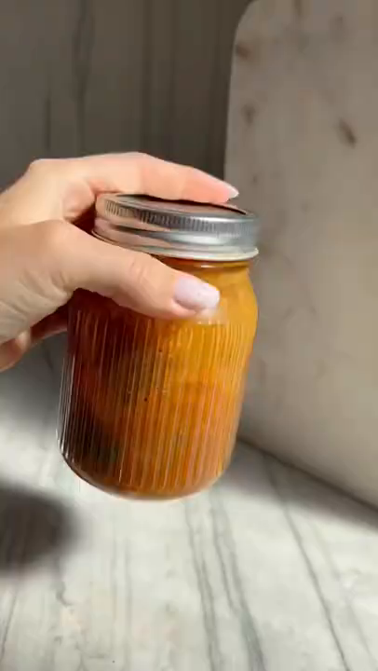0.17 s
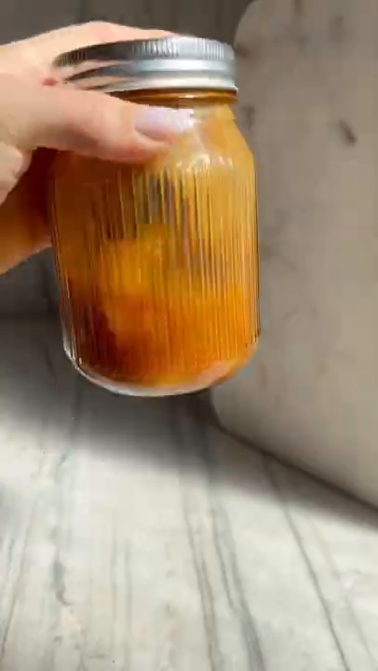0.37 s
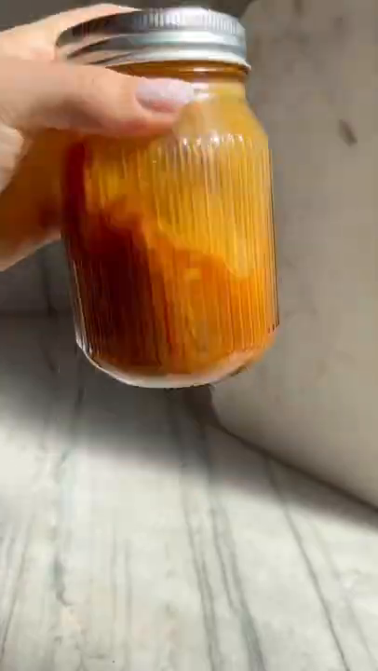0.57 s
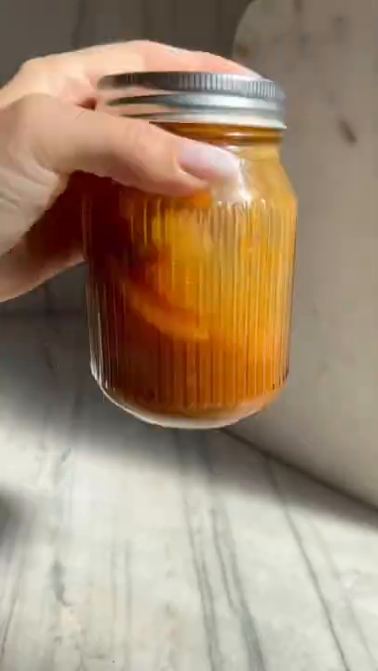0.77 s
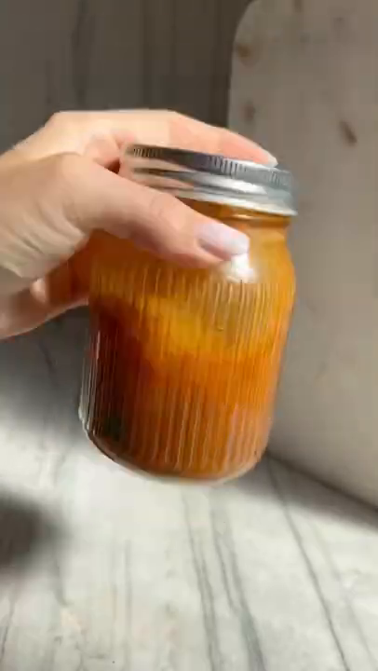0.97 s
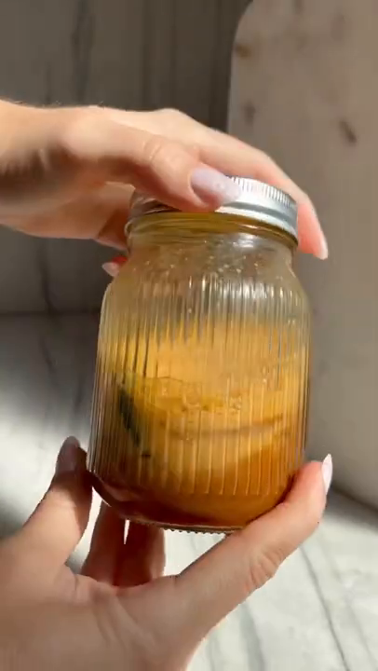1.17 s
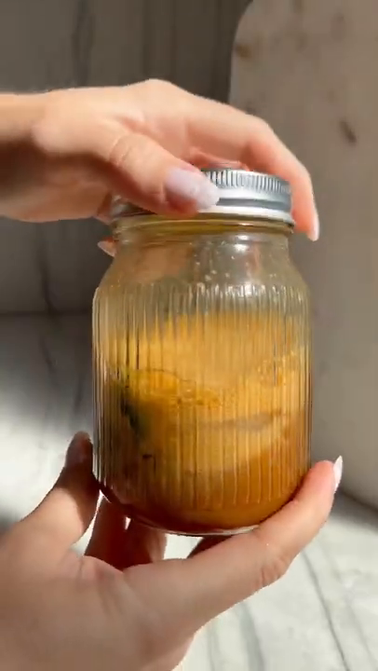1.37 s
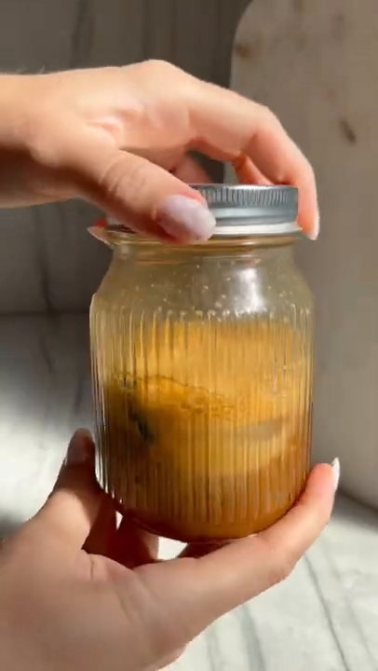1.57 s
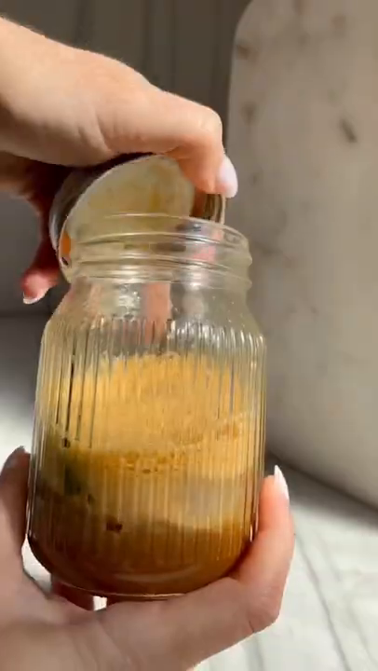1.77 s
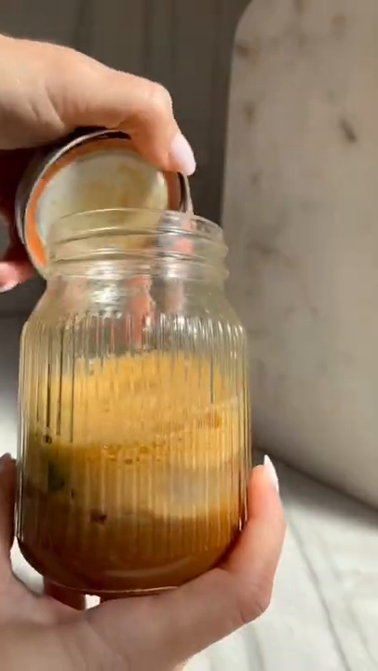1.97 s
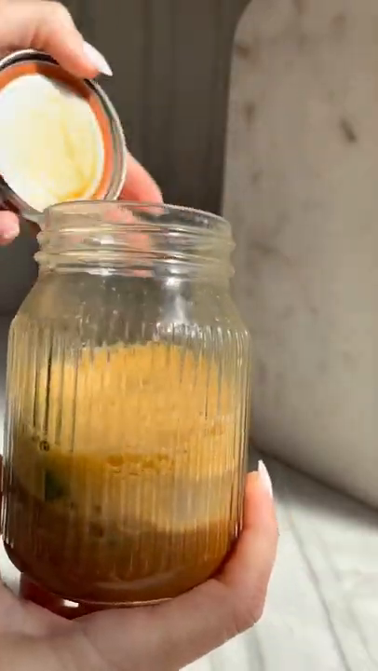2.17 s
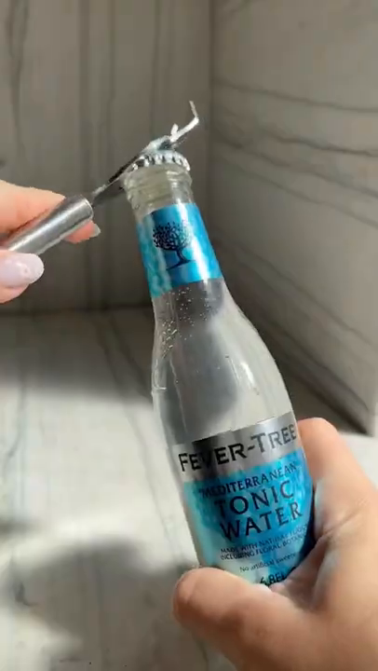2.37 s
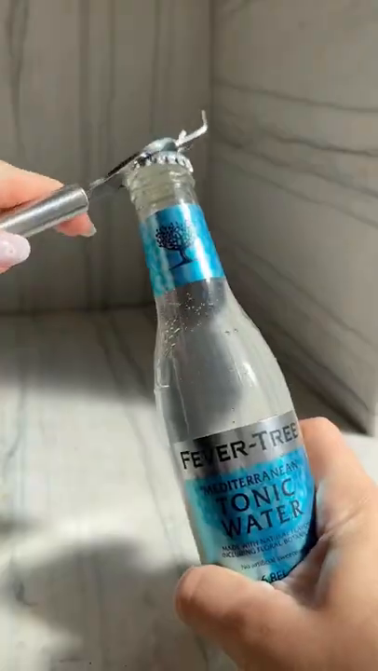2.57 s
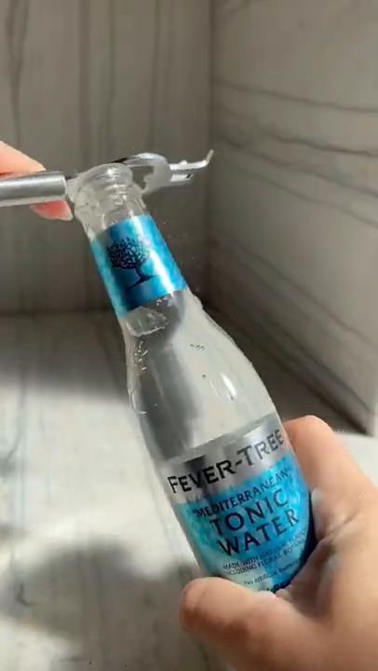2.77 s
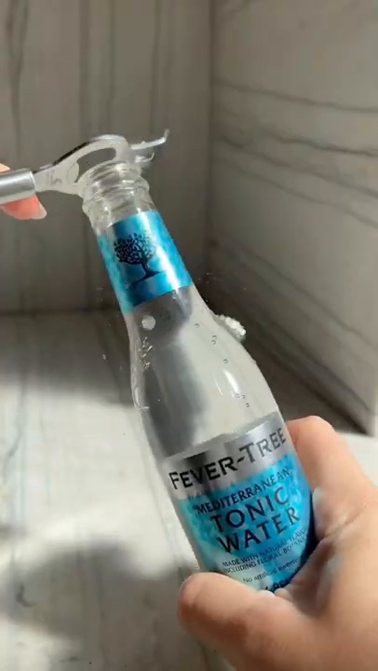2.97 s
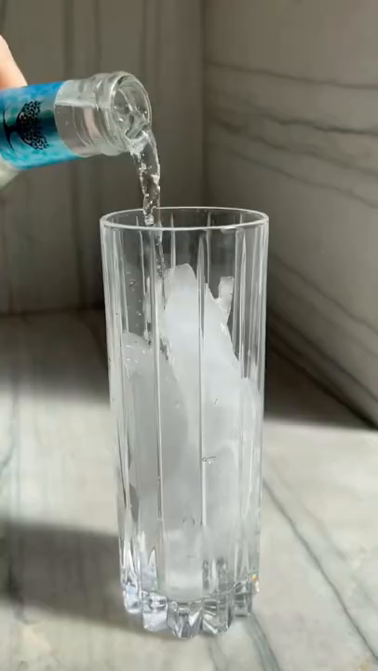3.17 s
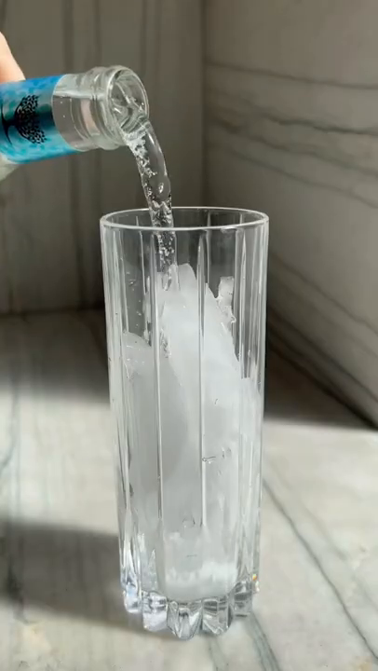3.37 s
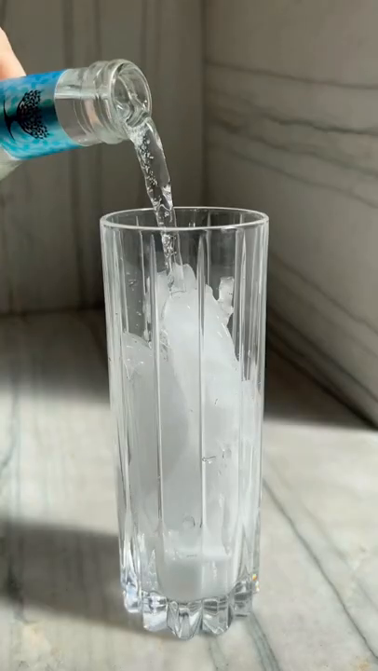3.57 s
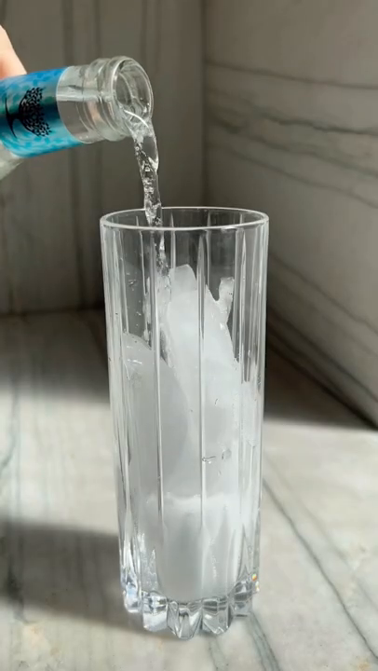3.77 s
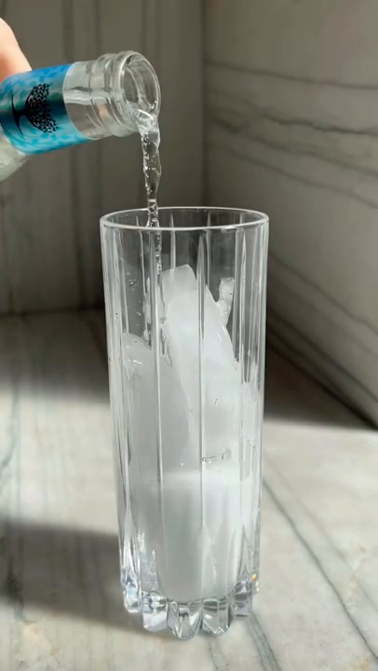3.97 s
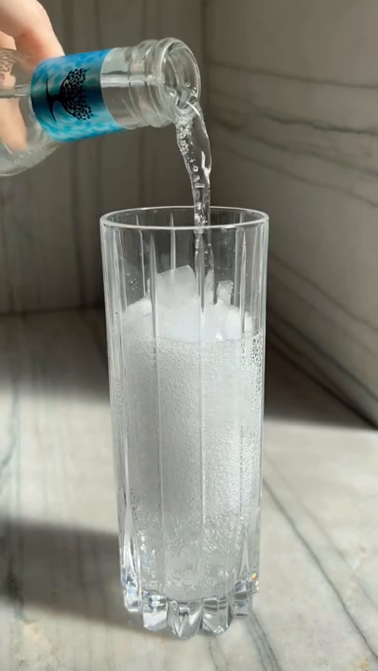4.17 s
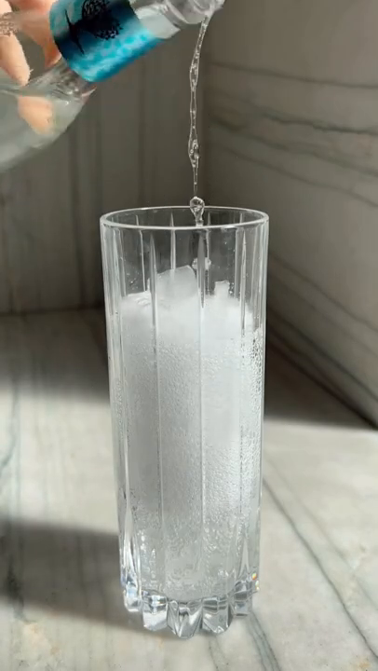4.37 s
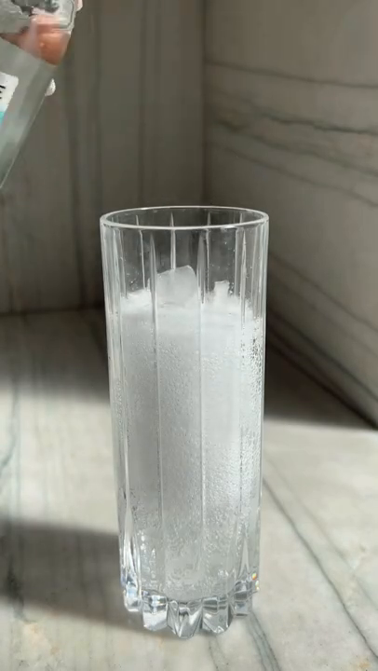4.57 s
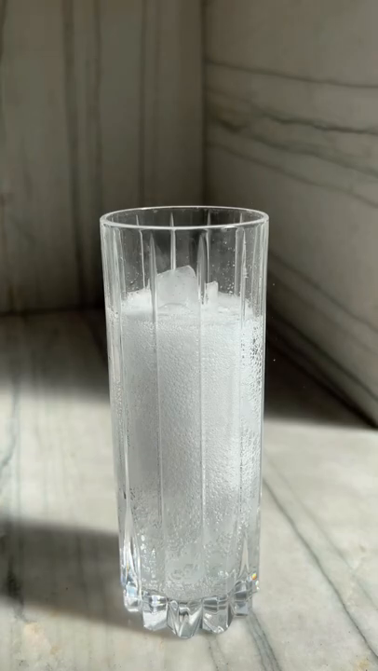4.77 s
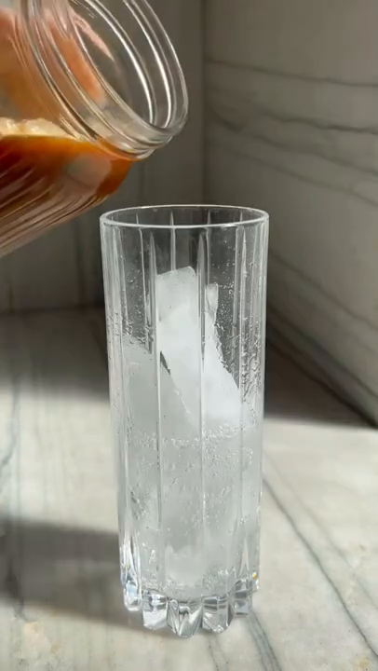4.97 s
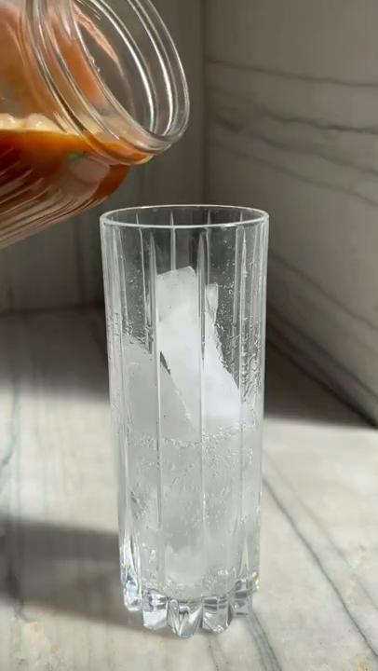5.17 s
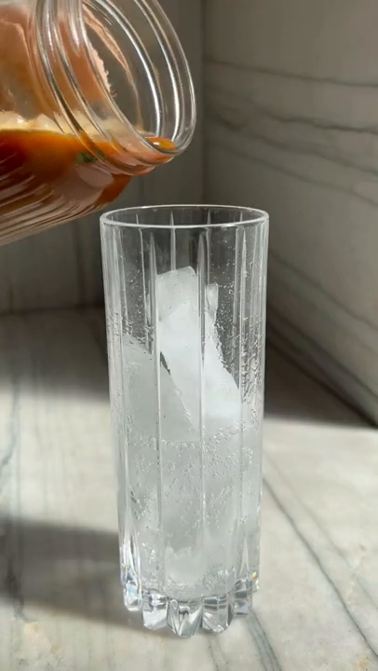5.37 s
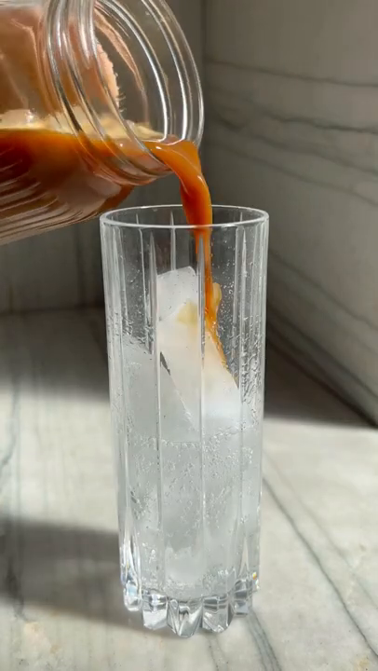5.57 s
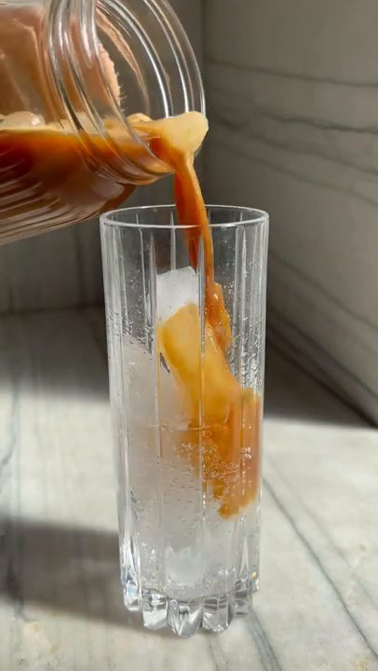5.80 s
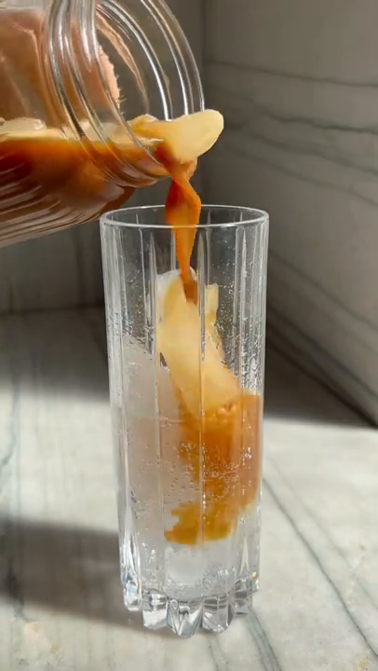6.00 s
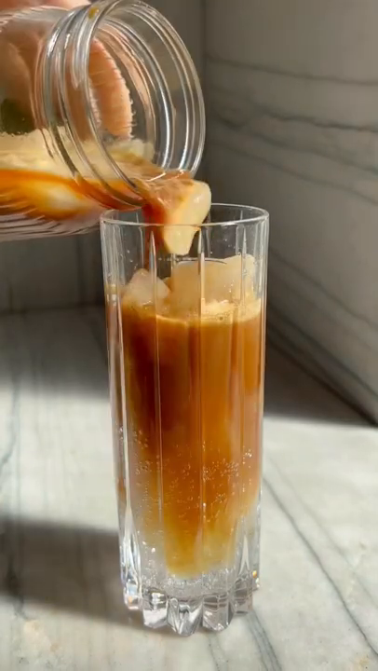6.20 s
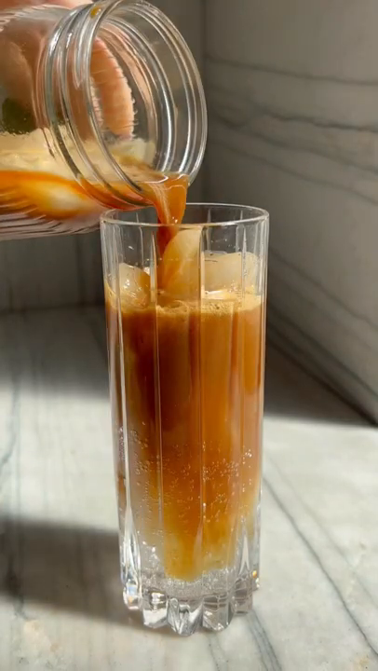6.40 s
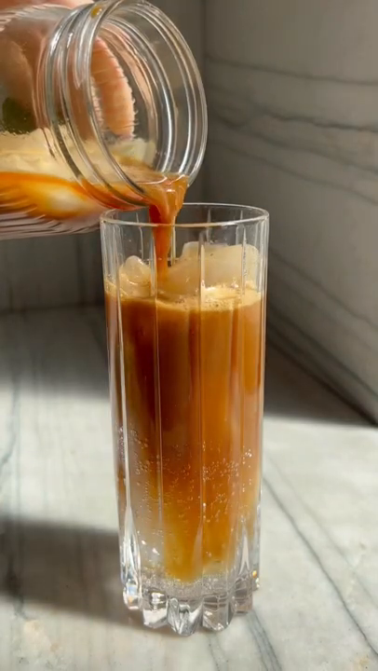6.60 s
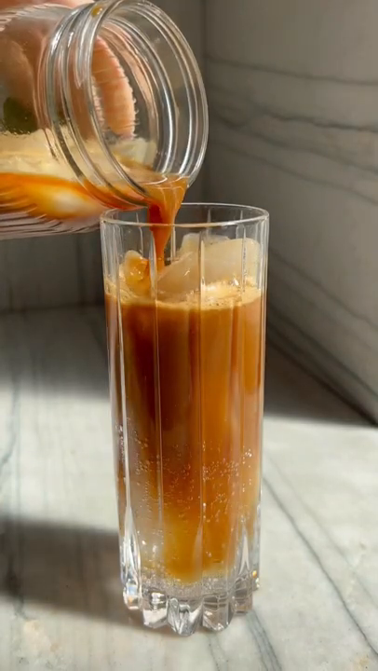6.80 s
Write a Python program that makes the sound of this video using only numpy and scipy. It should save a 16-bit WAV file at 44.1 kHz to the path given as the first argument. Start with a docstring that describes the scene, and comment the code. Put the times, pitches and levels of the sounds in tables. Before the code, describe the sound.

A close stereo kitchen sequence with hard cuts and a low, humming refrigerator-like rumble throughout. From 0 to 0.17 seconds, ice clatters brightly into a glass jar. Until about 1.03, four loud shaking strokes bring dense, hard ice rattles, wet churning and short hollow gulps. Near quiet follows until 1.7, when a metal lid comes away with a sharp clack, glassy ring and low thump, then small ticks up to 2.28. A tiny high puff at 2.49 precedes crisp prising knocks at 2.7; the cap knocks at 2.86 as hiss fades, with a brief ping at 3.07. Soda then pours very softly over ice, with rising glugs and fine fizz. The bottle clinks the rim at 4.65. From 5.57, coffee trickles with tiny drips and splashes; after 6.1 the trickle is fuller, with clearer ice clunks around 6.26, 6.35 and 6.6, dying down.

```python
"""Kitchen montage, about 6.8 s, shots cut hard over a refrigerator-like rumble (shaped noise and a hum).
Ice drops into a jar (modes rung by rough contact); it is shaken (random rattle, wet noise, gulping tones).
The lid comes off with a low thump; after a short high puff a bottle cap is prised off with another
(dying tones), and bounces as a high hiss trails off. Soda fizzes over ice in a tall glass (noise, gliding
bubble tones, air column); the bottle touches the rim; coffee follows with splashes and ice."""
import sys
import numpy as np
from scipy import signal
from scipy.fft import rfft, irfft
from scipy.io import wavfile
from scipy.ndimage import uniform_filter1d

SR = 44100
rng = np.random.default_rng(int(sys.argv[2]) if len(sys.argv) > 2 else 0)


def materialize(psi):
    """Save the field psi as 16-bit PCM at rate SR to the path in sys.argv[1].

    A 1-D psi becomes a single channel; in a 2-D psi each row is a channel.
    """
    bounded = np.clip(np.atleast_2d(psi).T, -1, 1)
    quanta = np.round(bounded * 32767).astype(np.int16)
    wavfile.write(sys.argv[1], SR, quanta)


N = 301644

# Shot boundaries in seconds.
CUTS_S = [0, .174, 1.034, 1.533, 2.291, 3.087, 4.021, 4.882, 6.105, 6.9]

# Rumble spectrum. Each row: frequency in Hz, relative level in dB per Hz.
RUMBLE = [(18, -30.5), (30, -1.5), (102, 2.5), (178, -21.5), (259, -13.5), (593, -23), (821, -33.5),
          (907, -34.5), (1110, -42.5), (1320, -39.5), (1500, -41.5), (1620, -44.5), (2540, -45.5),
          (5380, -58), (12000, -68), (15600, -89.5), (22000, -120)]
# Rumble by shot. Each row: level in dB, added air hiss above about 1 kHz in dB.
RUMBLE_BY_SHOT = [(-58.5, 5.3), (-57, 5.5), (-51.5, 7), (-50.5, 13.5), (-50, 5.5), (-51, -5), (-50, -1),
                  (-51, 6), (-50, 2)]
# Hum, one row: frequency in Hz, width in Hz, relative level in dB.
HUM_LINE = (119, 2.5, -67.5)
# Likeness of the channels in noise. Each row: frequency in Hz, left-right correlation (0-1).
STEREO_LIKENESS = [(60, 0.95), (180, 0.91), (550, 0.77), (1650, 0.33), (4970, 0.22), (15000, 0.089)]

# Ice into the jar. Each row: start in seconds, level in dB, pitch struck most in Hz, treble in dB.
ICE_DROP_BLOWS = [(0.0036, -27, 2590, 12), (0.0141, -24, 1520, -15), (0.0209, -17.5, 2566, -19),
                  (0.0434, -47, 2570, -17), (0.0731, -27, 2650, 6.5), (0.0866, -13, 2710, 7.5),
                  (0.093, -20, 2610, 0.5), (0.1284, -23.5, 1790, 8), (0.1461, -15, 2040, 10.5),
                  (0.1624, -26, 3270, -18)]
# Modes of the open jar. Each row: frequency in Hz, level in dB, t60 in seconds.
OPEN_JAR_MODES = [(807, -4, 0.055), (1780, -6, 0.015), (2037, -19.5, 0.14), (2450, -17.5, .05),
                  (2490, -4, 0.025), (3250, 3, 0.01), (3840, -2.5, 0.05), (4980, -8, .015),
                  (6100, -15, 0.016), (6350, -1.5, 0.027), (9270, -7.5, 0.061)]
# Contact noise. Each row: frequency in Hz, relative level in dB per Hz.
CONTACT_SPECTRUM = [(88, -46), (150, -11), (276, -12), (537, 1.5), (1330, -5), (1610, -4), (3400, -4),
                    (4660, -8.5), (6250, -6.5), (12900, -20.5), (16400, -28)]
# Loose chips and liquid dying down. Each row: start and end in seconds, first and last level in dB,
# treble in dB.
CHURN_RAMPS = [(0, .174, -29, -48.5, -1), (6.24, 6.84, -53.5, -72.5, -16.5)]

# Strokes of the shaking hand. Each row: start in seconds, length in seconds, highest rattle level in dB,
# churning level in dB.
SHAKE_STROKES = [(0.181, .11, -33.5, -39.5), (0.402, 0.12, -23.5, -37.5), (0.621, .14, -25, -41),
                 (0.862, 0.11, -26, -36)]
# Clearest knocks in the shaken jar. Each row: start in seconds, level in dB, pitch struck most in Hz,
# treble in dB.
SHAKE_BLOWS = [(0.2031, -28, 3040, -16.5), (0.241, -21, 3250, -5), (0.2516, -14.5, 2840, -0.5),
               (0.2646, -8.5, 3240, 7), (0.3451, -30.5, 3460, -17), (0.3705, -23.5, 3400, 3),
               (0.4079, -14, 1100, -3), (0.4179, -15.5, 3580, -11), (0.4274, -15, 3260, -5),
               (0.4373, -18, 3500, 6.5), (0.46, -14.5, 3170, 10.5), (0.4766, -14, 6250, 7.5),
               (0.5018, -15.5, 3600, 4), (0.5118, -10, 3300, 4.5), (0.6031, -24.5, 5600, 14),
               (0.631, -21, 3460, 1), (0.6414, -23, 3460, -6), (0.6598, -16.5, 3350, -14.5),
               (0.6715, -19.5, 3300, -12), (0.698, -14, 3300, 0), (0.721, -21, 3400, 8),
               (0.7278, -10.5, 7000, 4.5), (0.7366, -14.5, 2450, 7.5), (0.8355, -22, 3300, -0.5),
               (0.8679, -20.5, 2450, -6), (0.8892, -18.5, 3050, -6.5), (0.9026, -13.5, 3330, -5.5),
               (0.9371, -17.5, 3100, -19), (0.9434, -19, 2700, -3.5), (0.9518, -8.5, 3010, 5),
               (0.9674, -11.5, 2980, 1.5), (0.981, -14.5, 3060, 11.5), (1.008, -18.5, 3510, 4.5)]
# Modes of the full jar. Each row: frequency in Hz, level in dB, t60 in seconds.
FULL_JAR_MODES = [(607, -20.5, 0.073), (1072, 5.5, 0.012), (2090, -16.5, 0.0763), (2590, 2, 0.033),
                  (3060, 5, 0.018), (3300, 6, 0.015), (3460, 2, 0.045), (3800, -7.5, 0.15),
                  (5530, 1.5, 0.0099), (6250, 5.5, 0.026), (6200, -12.5, 0.036), (7770, 1, 0.04)]
# Air pockets gulping in the jar. Each row: start in seconds, level in dB, frequency in Hz,
# left over right in dB.
GULP_TONES = [(0.183, -23.5, 456, 11.5), (0.204, -29.5, 452, 14), (0.269, -31, 701, -6),
              (0.407, -24.5, 270, 1.5), (0.409, -25, 1100, -7), (0.442, -29, 280, 0), (0.482, -28, 670, 1),
              (0.676, -29.5, 621, -15.5), (0.699, -32.5, 624, -13.5), (0.75, -33.5, 486, -0.5),
              (0.868, -23, 353, 2), (0.88, -22, 279.5, -5.5), (0.888, -25, 641, -0.5),
              (0.922, -35.5, 476, 0), (0.951, -29, 912, 0)]

# Lid. Each row: start in seconds, level in dB, pitch struck most in Hz, treble in dB, factor on the t60.
LID_BLOWS = [(1.2925, -58, 1520, -26, 0.47), (1.6844, -43, 6230, 3, 3.05), (1.6921, -34, 6170, 4, 3.2),
             (1.7084, -22.5, 3840, 1, 0.93), (1.718, -14, 2560, 6, 0.4), (1.7335, -8.5, 2500, 11, .4),
             (1.7474, -18, 2300, 0, 0.53), (1.7544, -25, 2500, 25, .6), (1.8143, -27.5, 6130, 9, 0.79),
             (1.8657, -37.5, 2590, 6, 2.3), (1.921, -33, 3270, -3, 0.89), (1.9475, -34.5, 1920, 2.5, .5),
             (2.0467, -59, 1885, -14, .6), (2.16, -61, 3310, -27, .9), (2.1954, -38.5, 2480, 6, 0.66),
             (2.2383, -30, 2420, 9.5, 0.93), (2.2707, -23, 2480, 14.5, 1.37)]
# Modes of the lid on the jar. Each row: frequency in Hz, level in dB, t60 in seconds.
LID_MODES = [(746, -4.5, .05), (1958, -6, 0.062), (2300, -11, 0.031), (2473, -2, 0.044),
             (2648, -7.5, 0.025), (3030, -21, .04), (3634, -7, 0.062), (3720, -15.5, 0.086),
             (5640, -15.5, .03), (6250, -11.5, .035), (6890, -7.5, 0.11), (7220, -20, .025),
             (8850, -21.5, 0.023), (12630, -13.5, 0.022)]
# Lid on the rim, rung by the jar wall. Each row: start in seconds, level in dB, pitch struck most in Hz,
# treble in dB, factor on the t60.
JAR_WALL_BLOWS = [(1.709, -28, 1480, -12.5, 0.92), (1.734, -31, 834, -12.5, 0.8),
                  (1.748, -20, 727, -12, 0.5)]
# Low modes of the jar wall. Each row: frequency in Hz, level in dB, t60 in seconds.
JAR_WALL_MODES = [(727, -2, .12), (834, -2.5, 0.11), (853, -6.5, 0.5), (1480, 0, 0.22)]
# Low thumps as the lid and then the cap let go. Each row: start in seconds, level in dB,
# frequency in Hz, t60 in seconds.
LOW_THUMPS = [(1.735, -25, 232, 0.044), (2.713, -35.5, 72.3, 0.28)]

# Short high hissing puff, then the prising knocks. Each row: start in seconds, level in dB,
# pitch struck most in Hz, treble in dB.
PUFF_AND_PRISING = [(2.488, -32.5, 12500, 29), (2.497, -47.5, 12500, 18), (2.6905, -31.5, 3600, 6),
                    (2.6979, -17.5, 11300, 1), (2.703, -18.5, 3840, 16), (2.7106, -8, 2283, 6.5),
                    (2.7154, -24, 4030, 12), (2.7208, -19, 3900, 17), (2.7275, -15.5, 4050, 4.4),
                    (2.7315, -18.5, 3840, 2.5), (2.7392, -34.5, 3870, 14), (2.828, -37.5, 7070, 16)]
# Modes of the gripped cap. Each row: frequency in Hz, level in dB, t60 in seconds.
GRIPPED_CAP_MODES = [(1100, -11, .04), (2158, 2, 0.019), (3600, -9.5, .03), (3870, 3.5, 0.044),
                     (4050, -3.5, 0.11), (4560, 2, 0.041), (7070, -4.5, 0.027), (8300, -9, 0.032),
                     (11300, -8, 0.026), (12100, -11.5, 0.014), (12500, -2, 0.035), (13200, -3, 0.034),
                     (14400, -22, .1)]
# Fizz spectrum. Each row: frequency in Hz, relative level in dB per Hz.
FIZZ_SPECTRUM = [(530, -25), (900, -9.5), (1190, -29), (1410, -1.5), (1650, -10.5), (2520, -10.5),
                 (2750, -7.5), (5760, -5.5), (6580, -1), (10400, 2), (11900, 11), (15200, -1), (16400, -53)]
# High hiss trailing off around the cap's blow, then foam in each shot. Each row: start and end in seconds,
# first and last level in dB, treble in dB.
HISS_RAMPS = [(2.8, 3.07, -47, -69, -33), (3.088, 4.023, -64, -63.5, -19), (4.023, 4.884, -62, -62, -19.5),
              (4.884, 6.105, -65.5, -74, -23.5), (6.105, 6.9, -72, -82, -31.5)]
# Loose cap. Each row: start in seconds, level in dB, pitch struck most in Hz, treble in dB,
# factor on the t60.
CAP_BLOWS = [(2.8582, -8.5, 4156, -3.5, 0.63), (2.952, -41, 4156, -16.5, .7),
             (3.071, -13.5, 4156, 0.5, 3.4)]
# Modes of the loose cap. Each row: frequency in Hz, level in dB, t60 in seconds.
CAP_MODES = [(790, -20.5, 0.071), (1880, -30, 0.17), (3870, -7, 0.061), (4156, -17.5, 0.43),
             (4152, -4.5, 0.058), (7130, -17.5, 0.065), (7400, -17.5, 0.25), (9740, -25.5, 0.086),
             (12840, -8.5, 0.11), (12400, -15.5, .05), (14300, -12, 0.079)]

# Filled glass colouring the hiss. Each row: frequency in Hz, width in Hz, relative level in dB.
GLASS_RESONANCES = [(2120, 177, 18), (3510, 580, 9), (4400, 83, 17.5), (5250, 32, -9), (12600, 310, -3)]
# Low mode of the air above the liquid. Each row: start and end in seconds,
# first and last level in dB per Hz, first and last frequency in Hz.
COLUMN_LOW = [(3.11, 3.86, -99, -80, 600, 790), (3.86, 4.884, -96.5, -93.5, 770, 760),
              (5.5, 6.9, -93, -96, 642, 630)]
# Its upper band. Each row: start and end in seconds, first and last level in dB per Hz, frequency in Hz.
COLUMN_UPPER = [(3.11, 4.023, -107, -104, 1490), (4.023, 4.884, -93.5, -91, 1580),
                (4.884, 6.105, -108, -110, 1780), (6.105, 6.9, -88, -106, 1580)]
# Glugs as soda falls through the ice. Each row: first and last start in seconds, mean level in dB,
# first and last frequency in Hz.
GLUG_RUNS = [(3.123, 3.215, -51, 590, 620), (3.505, 3.73, -49.5, 646, 733)]
# Single bubbles and drips. Each row: start in seconds, level in dB, frequency in Hz.
SINGLE_BUBBLES = [(3.437, -48.5, 730), (3.765, -47, 1740), (3.807, -41, 1597), (3.826, -42.5, 800),
                  (4.193, -50, 1450), (4.227, -56, 1590), (5.583, -48, 2690), (5.586, -52, 654),
                  (5.734, -49, 2130), (5.775, -45.5, 1340), (5.802, -41, 3800), (5.831, -52, 2090),
                  (5.853, -60, 3150), (5.856, -49.5, 604), (5.933, -53.5, 1820), (6.059, -54, 2620),
                  (6.124, -53, 576), (6.167, -49.5, 1400), (6.188, -54.5, 1670)]
# Liquid trickling over ice. Each row: start and end in seconds, mean level in dB,
# lowest and highest frequency in Hz.
TRICKLE_SPANS = [(3.504, 3.9, -62.5, 1290, 2200), (5.57, 6.098, -65, 1310, 4550),
                 (6.11, 6.696, -57.5, 1290, 3600)]
# Splashes of poured liquid and ice knocks in the tall glass. Each row: start in seconds, level in dB,
# pitch struck most in Hz, treble in dB.
SPLASHES_AND_KNOCKS = [(3.3744, -41.5, 1400, 11), (3.6371, -40.5, 2900, 16), (3.7, -37.5, 5250, -1.5),
                       (3.7693, -43, 4460, -3), (5.6077, -48.5, 4130, 0), (5.7154, -46.5, 6560, -9.5),
                       (5.7334, -38.5, 2280, 5.5), (5.7743, -40.5, 1390, -3), (5.8012, -35, 3870, 13),
                       (5.8536, -46.5, 3220, -14), (5.9509, -46, 7880, 9), (6.035, -63.5, 6700, 10.5),
                       (6.0596, -50.5, 2720, 7.5), (6.085, -52, 6000, 10), (6.1983, -45.5, 1700, 1.5),
                       (6.2567, -19.5, 1400, -2), (6.2694, -27.5, 1480, 0), (6.2794, -29, 1850, -14),
                       (6.349, -21, 1900, 1), (6.4298, -42.5, 1410, -19), (6.549, -44, 1880, -10.5),
                       (6.5989, -43, 1970, -14), (6.6114, -29, 1360, -18), (6.735, -56, 6800, 12),
                       (6.776, -40.5, 3800, 3)]
# Modes of the tall glass. Each row: frequency in Hz, level in dB, t60 in seconds.
GLASS_MODES = [(800, 2.5, 0.12), (1400, -4, 0.03), (1700, 1, 0.02), (1978, -0.5, 0.026), (2866, -5, 0.026),
               (3150, 0.5, 0.024), (3830, 4, 0.011), (4580, 4, 0.0077), (5140, 2, 0.012),
               (6800, 6.5, 0.016), (8210, 0, 0.017)]
# Bottle neck on the rim. Each row: start in seconds, level in dB, pitch struck most in Hz, treble in dB.
BOTTLE_BLOWS = [(4.6543, -31.5, 6800, 3.4)]
# Modes of the bare rim. Each row: frequency in Hz, level in dB, t60 in seconds.
RIM_MODES = [(802, -15, 0.057), (3210, 2.5, 0.045), (6800, 2, 0.081), (11530, -6.5, 0.047)]

# Uneven reach of near sources to the two microphones. Each row: frequency in Hz, left lead in radians.
MIC_PHASE = [(0, -1.8), (780, -0.27), (1380, 0.0095), (6290, -1.43), (8010, -1.42), (14300, -1.6),
             (16100, -1.9)]
# Room decay. Each row: frequency in Hz, t60 in seconds.
ROOM_T60 = [(200, 0.31), (1000, 0.22), (3000, 0.23), (8000, 0.24), (14000, 0.12)]


def gain_of(db):
    """Decibels to amplitude factor."""
    return 10 ** (np.asarray(db) / 20)


def db_of(gain):
    """Amplitude factor to decibels."""
    return 20 * np.log10(gain)


def evened(x):
    """Scales to rms 1."""
    return x / np.sqrt(np.mean(x ** 2) + 1e-20)


def read(points, hz):
    """Interpolates a spectrum table over log frequency."""
    point_hz, value = np.transpose(points)
    return np.interp(np.log(hz + 1), np.log(point_hz + 1), value)


def ramps(rows, t):
    """Level running straight from first to last dB in each row, the other columns, progress 0-1."""
    rows = np.array(rows)
    row_at = np.clip(np.searchsorted(rows[:, 0], t) - 1, 0, len(rows) - 1)
    start, end, first_db, last_db, *rest = rows[row_at].T
    along = (t - start) / (end - start)
    inside = (along >= 0) & (along <= 1)
    level_db = np.where(inside, first_db + (last_db - first_db) * along, -200.)
    return level_db, rest, np.clip(along, 0, 1)


def add(mix, start_s, sound, pan_db):
    """Mixes a sound into both channels, cut at the end of its shot."""
    end_s = min(cut for cut in CUTS_S if cut > start_s)
    part = mix[:, round(start_s * SR):round(end_s * SR)][:, :len(sound)]
    part += gain_of([[pan_db / 2], [-pan_db / 2]]) * sound[:part.shape[1]]


def tilt_db(hz, treble_db, bass_db):
    """Shelves that open above 5 kHz and below 1.4 kHz."""
    return treble_db / (1 + (5000 / (hz + 1)) ** 6) + bass_db / (1 + (hz / 1400) ** 6)


def resonances(hz, peaks, lift):
    """Gain of a row of resonances over a flat response."""
    return 1 + lift * sum(gain_of(db) / (1 + (2 * (hz - f) / width) ** 2) for f, width, db in peaks)


def noise(field_db, size, patchy_db, flicker_db):
    """Random short-time spectra under a level field (Hz, s), with local patches and broadband flicker."""
    hz = np.fft.rfftfreq(size, 1 / SR)[:, None]
    t = np.arange(4 * N // size + 5) * size / 4 / SR
    a, b, c, d, patches = rng.standard_normal((len(t), len(hz), 5)).T
    patches = evened(uniform_filter1d(uniform_filter1d(patches, 6, 0), 10, 1))  # 6 bins by 10 frames
    flicker = rng.exponential(1, len(t)) - 1
    same = read(STEREO_LIKENESS, hz)
    left = a + 1j * b
    right = same * left + np.sqrt(1 - same ** 2) * (c + 1j * d)
    level_db = field_db(hz, t) + patchy_db * patches + flicker_db * flicker
    spectra = np.array([left, right]) * gain_of(level_db) * np.sqrt(SR / size)
    return signal.istft(spectra, nperseg=size, noverlap=size - size // 4)[1][:, :N]


def blows(rows, modes, crack_db, crack_s, focus_db, bass_db, scatter_db, detune, grit, size=2 ** 13):
    """A tap and rough contact ring the modes, most near the blow's pitch; the contact is heard too."""
    out, t = np.zeros((2, N)), np.arange(size) / SR
    mode_hz, mode_db, t60_s = (column[:, None] for column in np.transpose(modes))
    hz = np.fft.rfftfreq(size, 1 / SR)
    edges = np.minimum(t / 0.00042, 1) * np.minimum((t[-1] - t) / .03, 1)
    for start_s, peak_db, pitch_hz, treble_db, *free in rows:
        ring = free[0] if free else 1
        half_width_hz = np.log(1000) / (2 * np.pi * np.clip(t60_s * ring, .004, .5))
        chance, rough = rng.standard_normal((len(mode_hz), 1)), rng.standard_normal(size)
        side = rng.uniform(-1.1, 1)
        level = gain_of(mode_db + focus_db * np.exp(-(np.log(mode_hz / pitch_hz) / 0.055) ** 2))
        rung_hz = mode_hz * (1 + detune * chance)
        body = (level / (half_width_hz + 1j * (hz - rung_hz))).sum(0)
        contact_decay = gain_of(-60 * t / (crack_s * min(ring, 1.5)))
        contact = rfft(rough * contact_decay * np.minimum(t / 0.0003, 1))
        shelves = gain_of(tilt_db(hz, treble_db, bass_db))
        strike = 1 + grit * contact / np.sqrt(np.mean(abs(contact) ** 2))  # 1 is the sharp tap
        rings = irfft(strike * shelves * body)
        near_pitch_db = 7.1 * np.exp(-(np.log((hz + 1) / pitch_hz) / 0.18) ** 2)
        crack = irfft(contact * shelves * gain_of(read(CONTACT_SPECTRUM, hz) + near_pitch_db))
        sound = rings / abs(rings).max() + gain_of(crack_db) * crack / abs(crack).max()
        add(out, start_s, gain_of(peak_db) * sound * edges, scatter_db * side)
    return out


def rising_tones(rows, glide_per_s, rise_s):
    """Dying tones of rising pitch, each with a soft onset."""
    out, t = np.zeros((2, N)), np.arange(8000) / SR
    for start_s, peak_db, hz, t60_s, pan_db in rows:
        tone = np.sin(2 * np.pi * hz * (t + glide_per_s * t ** 2)) * (1 - np.exp(-t / rise_s))
        add(out, start_s, gain_of(peak_db - 60 * t / t60_s) * tone, pan_db)
    return out


def kitchen(hz, t):
    """Level field of rumble, air hiss and a wavering hum, a little different in each shot."""
    hum_hz, width_hz, hum_db = HUM_LINE
    hum = gain_of(hum_db - 17.5) / (1 + ((hz - hum_hz) / width_hz) ** 2)
    shot = np.clip(np.searchsorted(CUTS_S, t) - 1, 0, len(RUMBLE_BY_SHOT) - 1)
    shot_db, hiss_db = np.array(RUMBLE_BY_SHOT)[shot].T
    rumble_db = read(RUMBLE, hz) - 21 + shot_db + hiss_db / (1 + (900 / (hz + 1)) ** 4)
    return db_of(gain_of(rumble_db) + hum)


def churn(hz, t):
    """Level field of wet chips scraping: contact noise in the jar wall, swelling with each stroke."""
    level_db, (treble_db,), _ = ramps(CHURN_RAMPS, t)
    for start_s, length_s, _, churn_db in SHAKE_STROKES:
        rise_db = 60 * np.clip(start_s - t, 0, None) / 0.09
        settle_db = 154 * np.clip(t - start_s - length_s, 0, None)  # 154 dB/s
        stroke_db = churn_db - rise_db - settle_db
        level_db = np.maximum(level_db, np.where(t < CUTS_S[2], stroke_db, level_db))
    wall = resonances(hz, [(2470, 560, 1.5), (3400, 650, -3), (6000, 450, -9.0)], lift=1.0)
    return read(CONTACT_SPECTRUM, hz) - 40 + level_db + tilt_db(hz, treble_db, 0) + db_of(wall)


def ice_drops():
    """Ice knocks the open jar and rings its modes."""
    return blows(ICE_DROP_BLOWS, OPEN_JAR_MODES, crack_db=-6.5, crack_s=0.04, focus_db=23, bass_db=1,
                 scatter_db=4, detune=0.016, grit=1.0)


def rattle(count):
    """Small random knocks spread over each stroke, as rows for the blows."""
    rows = []
    for start_s, length_s, top_db, _ in SHAKE_STROKES:
        for k, (late, size, place) in enumerate(rng.standard_normal((count, 3))):
            knock_s = start_s + length_s * (k + .5 + .3 * late) / count
            rows.append((knock_s, top_db - 4.5 * abs(size), 3200 * np.exp(0.88 * place), 0))
    return rows


def shaken_ice():
    """Ice knocks the full jar, the clear knocks among random rattle."""
    return blows(SHAKE_BLOWS + rattle(count=9), FULL_JAR_MODES, crack_db=-4.5, crack_s=0.027, focus_db=12.5,
                 bass_db=-4.5, scatter_db=3.5, detune=.035, grit=0.83)


def gulps():
    """Air pockets gulp in the shaken jar as short rising tones."""
    rows = [(start_s, db, hz, .065, pan_db) for start_s, db, hz, pan_db in GULP_TONES]
    return rising_tones(rows, glide_per_s=0.24, rise_s=0.0015)


def lid():
    """The lid rings on the jar, each blow with its own freedom to ring."""
    return blows(LID_BLOWS, LID_MODES, crack_db=-2.5, crack_s=0.053, focus_db=10.5, bass_db=-6,
                 scatter_db=4, detune=0.015, grit=0.99)


def jar_wall():
    """The lid strikes the rim and the jar wall rings low."""
    return blows(JAR_WALL_BLOWS, JAR_WALL_MODES, crack_db=-22.5, crack_s=0.0095, focus_db=11, bass_db=2.0,
                 scatter_db=0, detune=0.00074, grit=0.24, size=2 ** 14)


def low_thumps():
    """Low thumps as lid and cap let go: one dying tone each."""
    return rising_tones([row + (0,) for row in LOW_THUMPS], glide_per_s=.3, rise_s=0.0065)


def puff_and_prising():
    """A short high hissing puff, then prising knocks, all rung by the modes of the gripped cap."""
    return blows(PUFF_AND_PRISING, GRIPPED_CAP_MODES, crack_db=-4.5, crack_s=0.045, focus_db=18, bass_db=-1.5,
                 scatter_db=2.5, detune=0.02, grit=0.88)


def hiss_and_soda(hz, t):
    """Level field of the trailing hiss, then bursting bubbles that also excite the air column."""
    ramp_db, (treble_db,), _ = ramps(HISS_RAMPS, t)
    hiss_db = read(FIZZ_SPECTRUM, hz) - 32.0 + ramp_db + treble_db / (1 + (9000 / (hz + 1)) ** 8)
    hiss = gain_of(hiss_db) * resonances(hz, GLASS_RESONANCES, lift=0.25)
    low_db, (first_hz, last_hz), along = ramps(COLUMN_LOW, t)
    low_hz = first_hz + (last_hz - first_hz) * along
    low = gain_of(low_db) / (1 + ((hz - low_hz) / 50) ** 2)
    upper_db, (upper_hz,), _ = ramps(COLUMN_UPPER, t)
    upper = gain_of(upper_db) / (1 + ((hz - upper_hz) / 300) ** 4)
    return db_of(hiss + low + upper)


def cap():
    """The loose metal cap bounces and rings."""
    return blows(CAP_BLOWS, CAP_MODES, crack_db=-13.5, crack_s=0.077, focus_db=8.5, bass_db=0,
                 scatter_db=4, detune=0.0011, grit=0.3, size=2 ** 14)


def glugs(gap_s):
    """Uneven trains of bubbles whose pitch climbs as the glass fills."""
    rows = []
    for first_s, last_s, db, low_hz, high_hz in GLUG_RUNS:
        for s in np.arange(first_s, last_s, gap_s):
            late, size, place = rng.standard_normal(3)
            hz = np.interp(s, [first_s, last_s], [low_hz, high_hz]) * (1 + 0.015 * place)
            rows.append((s + .25 * gap_s * late, db + 1.5 * size, hz))
    return rows


def trickle(count):
    """Small bubbles at random moments and pitches."""
    return [(start_s + (end_s - start_s) * at, db + 9 * (size - .5), low_hz * (high_hz / low_hz) ** place)
            for start_s, end_s, db, low_hz, high_hz in TRICKLE_SPANS
            for at, size, place in rng.random((count, 3))]


def bubbles():
    """Bubbles in the glass ring as rising tones, the smaller (higher) dying faster."""
    rows = SINGLE_BUBBLES + glugs(gap_s=0.026) + trickle(count=45)
    rows = [(s, db, hz, 0.064 * (700 / hz) ** 0.62, 0) for s, db, hz in rows]  # t60 0.064 s at 700 Hz
    return rising_tones(rows, glide_per_s=2.51, rise_s=0.0012)


def splashes_and_knocks():
    """Splashes of poured liquid and ice knocks, both as rough blows on the modes of the tall glass."""
    return blows(SPLASHES_AND_KNOCKS, GLASS_MODES, crack_db=-6.0, crack_s=0.031, focus_db=19.5, bass_db=-20.5,
                 scatter_db=.7, detune=0.033, grit=1.0)


def bottle_on_rim():
    """The bottle neck touches the bare rim, which rings."""
    return blows(BOTTLE_BLOWS, RIM_MODES, crack_db=-9, crack_s=0.0035, focus_db=0.0, bass_db=7,
                 scatter_db=0, detune=0.0014, grit=0.35)


def phase_apart(x):
    """Turns the phase of the two channels apart."""
    turn = np.exp(.5j * read(MIC_PHASE, np.fft.rfftfreq(N, 1 / SR)))
    return irfft(rfft(x) * np.array([turn, 1 / turn]), N)


def walls():
    """Room echo: sparse taps of random sign, each band dying at its own speed."""
    taps = np.zeros((2, SR // 2))
    at = np.arange(120, SR // 2 - 20, 20)
    at = at + rng.integers(0, 20, (2, len(at)))
    np.put_along_axis(taps, at, rng.choice([-1., 1.], at.shape), 1)
    hz, t, spectra = signal.stft(taps, SR, nperseg=256)
    decay = gain_of(-60 * t / read(ROOM_T60, hz)[:, None])
    tail = signal.istft(spectra * decay, SR, nperseg=256)[1]
    return tail / np.linalg.norm(tail[0])


def scene():
    """Sums the sources; each shot has its own echoes and millisecond fades."""
    near = ice_drops() + shaken_ice() + gulps() + lid() + jar_wall() + low_thumps() + puff_and_prising()
    near += cap() + bubbles() + splashes_and_knocks() + bottle_on_rim()
    near = phase_apart(near)
    steady = noise(kitchen, size=2048, patchy_db=2.5, flicker_db=0.5)
    steady += noise(churn, size=128, patchy_db=5.0, flicker_db=3.0)
    steady += noise(hiss_and_soda, size=512, patchy_db=3.0, flicker_db=-0.1)
    tail, t, out = walls(), np.arange(N) / SR, np.zeros((2, N))
    for start_s, end_s in zip(CUTS_S, CUTS_S[1:]):
        shot = slice(round(start_s * SR), round(end_s * SR))
        shot_t = t[shot]
        wet = signal.fftconvolve(near[:, shot].mean(0)[None], tail, axes=1)[:, :len(shot_t)]
        fade_in = np.clip((shot_t - start_s) / 0.011 + (start_s == 0), 0, 1)  # none on the first shot
        fade_out = np.clip((end_s - shot_t) / 0.0011, 0, 1)
        out[:, shot] = fade_in * fade_out * (near[:, shot] + gain_of(-5.5) * wet + steady[:, shot])
    return out


def record(dry):
    """Microphones lose the deepest bass, and hear the low range nearly alike; then the band limit."""
    mid = signal.sosfilt(signal.butter(4, 36, "high", fs=SR, output="sos"), dry.mean(0))
    side = signal.sosfilt(signal.butter(2, 170, "high", fs=SR, output="sos"), (dry[0] - dry[1]) / 2)
    band = signal.firwin(511, 16300, window=("kaiser", 9), fs=SR)  # low-pass, Hz
    return signal.oaconvolve(np.array([mid + side, mid - side]), band[None], "same", axes=1)


dry = scene()
out = record(dry)
materialize(out)
```